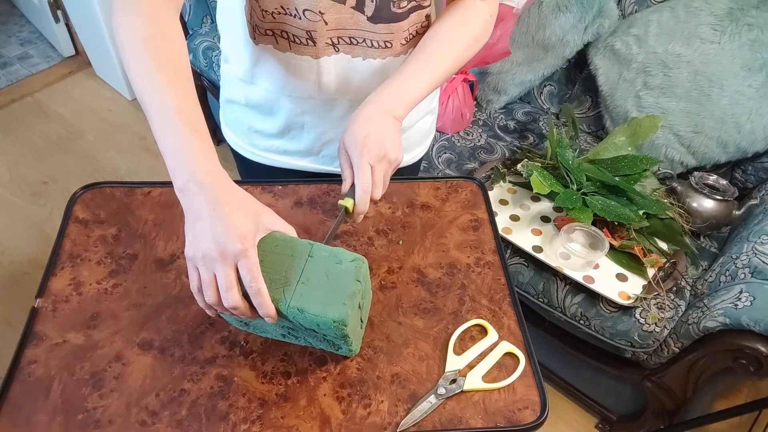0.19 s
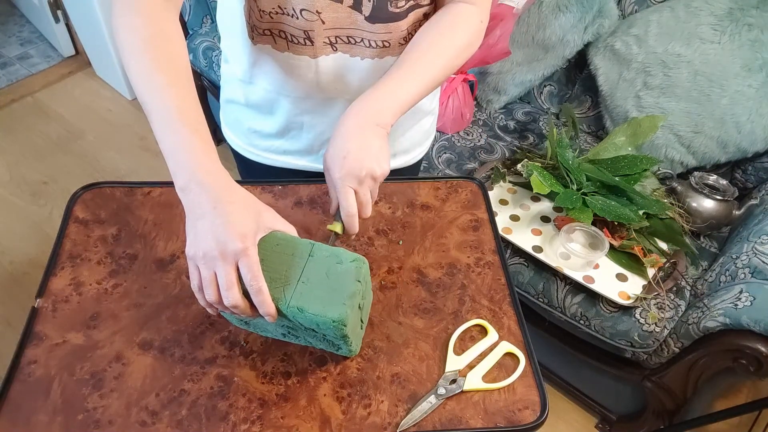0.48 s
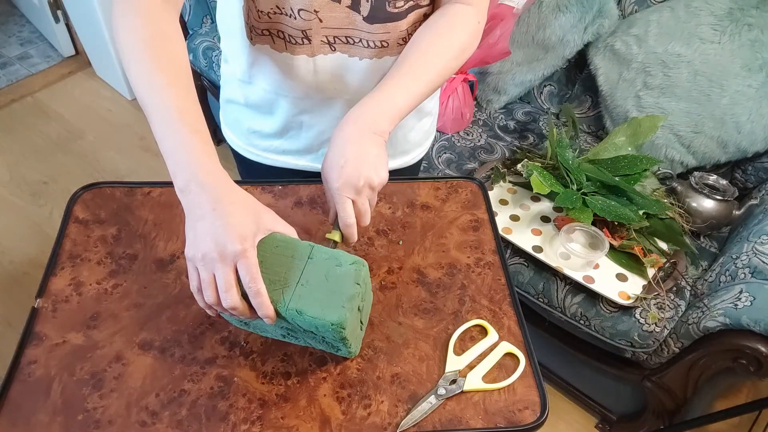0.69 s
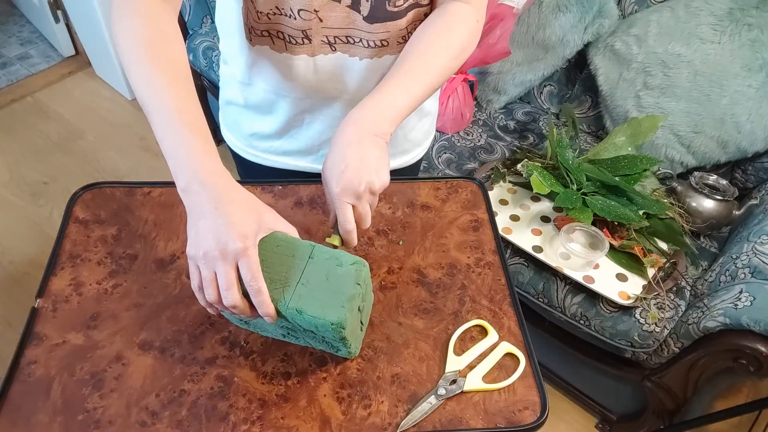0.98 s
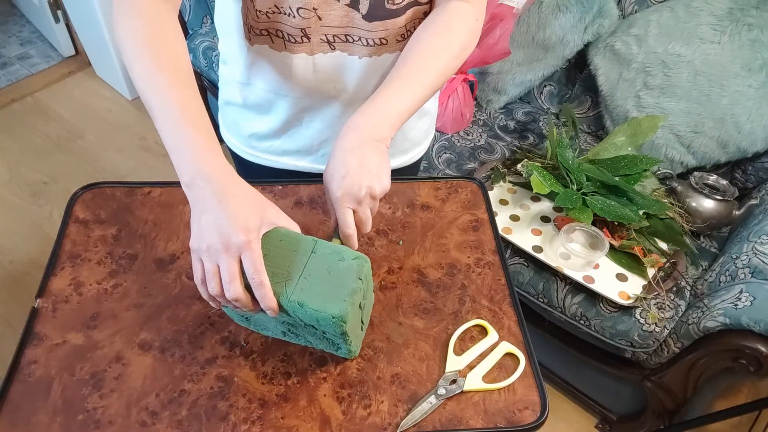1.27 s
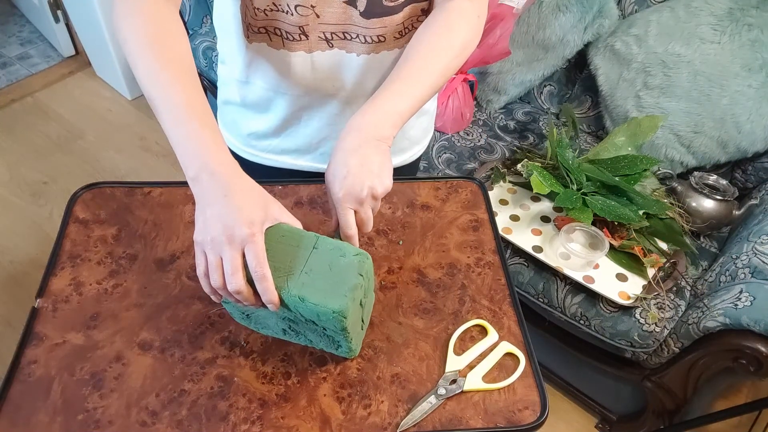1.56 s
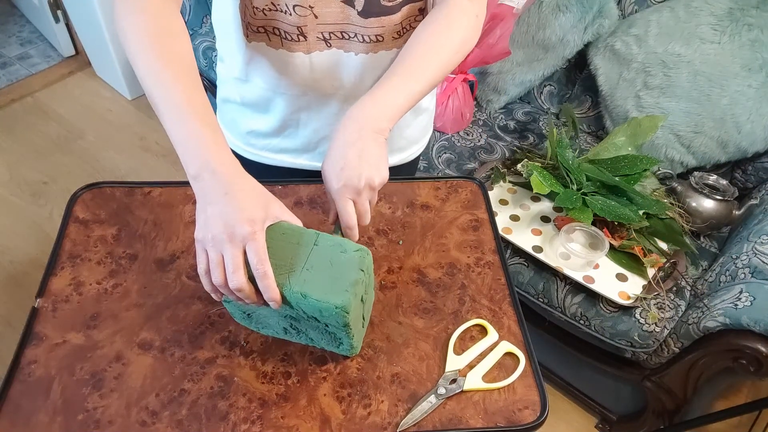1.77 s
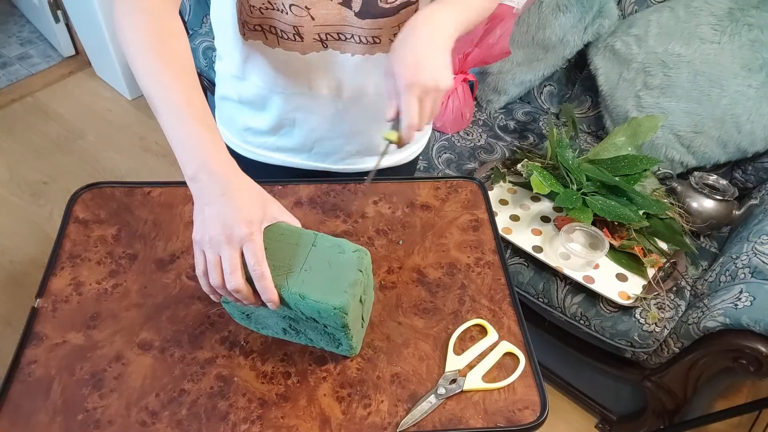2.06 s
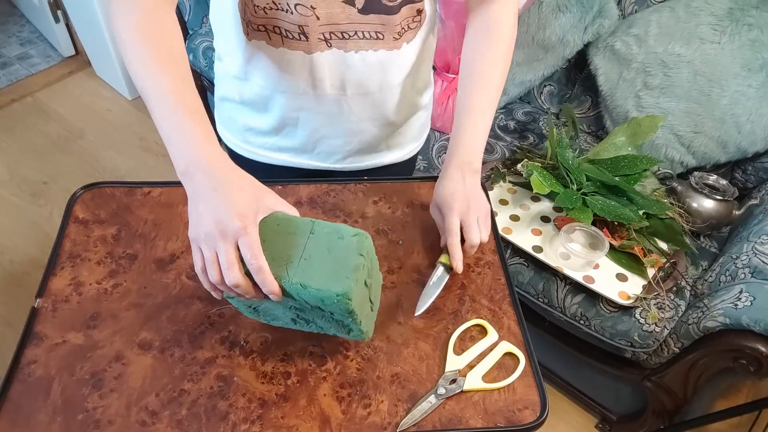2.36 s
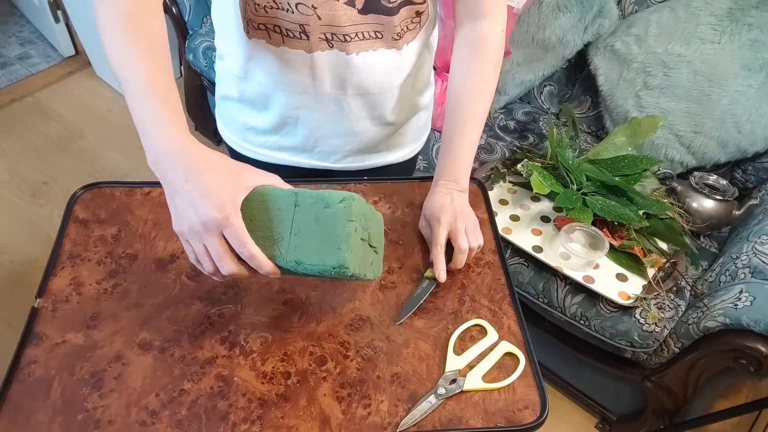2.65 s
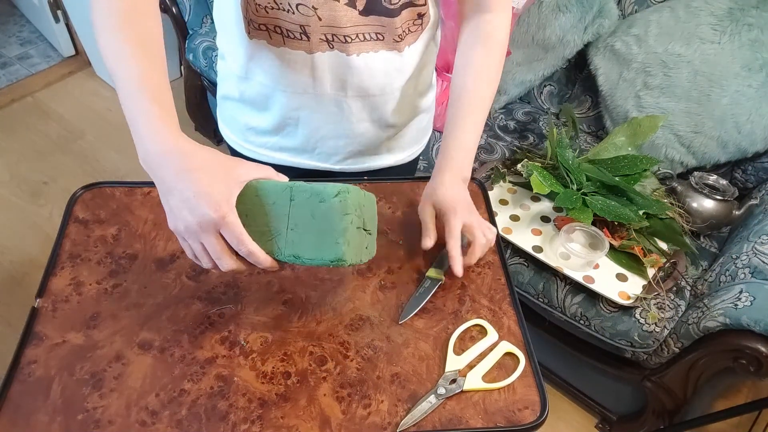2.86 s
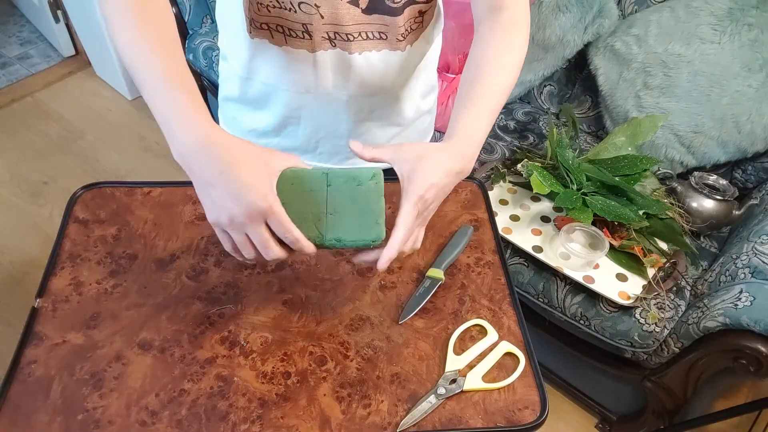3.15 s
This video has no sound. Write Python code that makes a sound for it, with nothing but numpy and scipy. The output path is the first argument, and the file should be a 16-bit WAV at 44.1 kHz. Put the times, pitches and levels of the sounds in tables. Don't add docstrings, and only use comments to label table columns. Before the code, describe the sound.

A knife saws a dry foam block in crunchy, uneven strokes that turn hollow; the blade knocks the wooden table sharply, weak scrapes follow, then the knife is set down softly. Small furnished room, close stereo microphone.

```python
import sys
import numpy as np
from scipy import signal
from scipy.fft import rfft, irfft, next_fast_len
from scipy.io import wavfile
from scipy.ndimage import uniform_filter1d, map_coordinates

SR = 44100
rng = np.random.default_rng(int(sys.argv[2]) if len(sys.argv) > 2 else 0)


def linear_from_db(decibels):
    return 10 ** (np.asarray(decibels, float) / 20)


def wav_out(sig):
    wavfile.write(sys.argv[1], SR, np.round(np.clip(np.atleast_2d(sig).T, -1, 1) * 32767).astype(np.int16))


N = 145530

# (frequency [Hz], density [dB per Hz])
CHOP_TONE = [(47, -28), (80, -11), (382, -12.5), (607, -3), (1050, -4.5), (1750, -5), (8000, -26),
             (15500, -37.5)]


def sawing():
    # (start [s], rise [s], stop [s], level [dB], fade [s])
    strokes = [
        (.0, 0.33, .6, -40, 0.12),
        (0.748, 0.0064, 0.79, -42.5, 0.12),
        (0.882, 0.003, 1.116, -42.5, 0.15),
        (1.236, 0.0072, 1.26, -38, 0.11),
        (1.446, 0.032, 1.667, -49.5, 0.01),
        (1.773, 0.039, 1.899, -47.5, .1),
        (1.955, 0.009, 2.015, -61, 0.01),
        (3.188, 0.0015, 3.207, -54.5, 0.078),
    ]
    # (time [s], level [dB])
    depth = [(0, -70), (.5, -25), (.66, 6.5), (.8, -1.5), (1.2, -1), (1.55, 2.5), (1.8, -1), (1.95, -24),
             (3.3, -9)]
    # (frequency [Hz], density [dB per Hz])
    rasp_tone = [(150, -48), (250, -16.5), (1430, 0.5), (1560, -3), (2060, -1), (6100, -9.5), (8040, -4.5),
                 (8920, -14), (15500, -14)]
    # (frequency [Hz], width [Hz], level [dB])
    block = [(270, 25, -19.5), (362.4, 34, 5.5), (453, 110, -9.5), (663, 105, -2.5), (1100, 410, -12),
             (1930, 535, -1.5)]
    rise_db, fade_db, sag_db_per_s = 22, 24, 6.5
    cells_per_s, cell_spread_db, smooth_share = 6000, 3.5, 0.79

    t = np.arange(N) / SR
    push = np.zeros(N)
    for start, rise, stop, db, fade in strokes:
        onset = rise_db * np.clip(1 - (t - start) / rise, 0, None) ** 2
        sag = sag_db_per_s * (t - start)
        decay = fade_db * np.clip((t - stop) / fade, 0, 9) ** 0.96
        push += linear_from_db(db - onset - sag - decay) * (t > start)
    push *= linear_from_db(0.75 * wobble(13.45) + 0.75 * wobble(69.6))

    chance, size = rng.random((2, N))
    crushed = chance < cells_per_s / SR
    cells = crushed * linear_from_db(-cell_spread_db * np.log(size + 0.0037)) * rng.standard_normal(N)
    grit = patchy(smooth_share * rng.standard_normal(N) + unit(cells), patchy_db=3.5)

    def resonances(f):
        return sum((-1) ** k * linear_from_db(db) * peak(f, hz, width) for k, (hz, width, db) in enumerate(block))

    rasp = unit(filtered(grit, lambda f: linear_from_db(along(rasp_tone, f))))
    hum = unit(filtered(grit, resonances))
    coupling = linear_from_db(np.interp(t, *np.transpose(depth)) + 3)
    return push * (rasp + coupling * hum)


def rubs():
    # (centre [s], length [s], frequency [Hz], width [Hz], level [dB])
    rub_events = [(.39, .07, 7990, 200, -50), (.42, .04, 6900, 200, -54), (.28, .12, 1350, 150, -52),
                  (.66, .035, 365, 70, -52), (1.65, .03, 1250, 60, -48), (1.99, .04, 2200, 600, -58),
                  (2.27, .08, 2500, 4000, -70), (2.746, .018, 550, 200, -55), (.47, .05, 8300, 500, -56),
                  (1.805, .02, 1250, 90, -50), (2.45, .05, 1400, 50, -65), (2.61, .05, 360, 40, -59),
                  (2.7, .04, 360, 50, -59), (3.05, .07, 3230, 110, -72), (2.177, .006, 6500, 3000, -66)]
    out, t = np.zeros(N), np.arange(N) / SR
    noises = rng.standard_normal((len(rub_events), N))
    for (centre, length, hz, width, db), noise in zip(rub_events, noises):
        near = slice(max(round((centre - .2) * SR), 0), round((centre + 0.54) * SR))
        band = unit(filtered(noise[near], lambda f: peak(f, hz, width) ** 2))
        swell = np.exp(-2 * ((t[near] - centre) / length * 2) ** 2)
        out[near] += linear_from_db(db) * band * swell
    return out


def catches():
    # (time [s], peak level [dB], hardness [0 to 1])
    ticks = [
        (.749, -38, .9),
        (.882, -36, 1),
        (1.238, -34.5, 1),
        (1.419, -48, .9),
        (1.448, -40.5, 0.68),
        (1.463, -42.5, 1),
        (1.797, -42.5, 0.37),
        (3.188, -63, 0.97),
    ]
    return knocks(ticks, [], CHOP_TONE, ring_db=0, crack_s=0.012, thud_db=3, thud_s=0.025)


def chopping():
    # (time [s], peak level [dB], hardness [1 = hard])
    chops = [
        (1.5355, -12, 1.68),
        (1.544, -28, 0.22),
        (1.555, -16, 0.25),
    ]
    # (frequency [Hz], level [dB], t60 [s])
    chop_modes = [(102, -22, 0.22), (366, -5, 0.089), (605, -3.5, 0.038), (745, 2, .04), (1085, 0.5, 0.046),
                  (1296, -6, 0.047), (2800, 6.5, 0.0057), (7900, -6.5, .015)]
    return knocks(chops, chop_modes, CHOP_TONE, ring_db=-6.0, crack_s=0.0077, thud_db=-10.5, thud_s=0.11)


def laying_down():
    # (time [s], peak level [dB], hardness [1 = hard])
    landings = [
        (2.7575, -21.5, 0.84),
        (2.7645, -34, 0.24),
        (2.776, -28, .1),
    ]
    # (frequency [Hz], level [dB], t60 [s])
    lay_modes = [(106, -18, 0.17), (227, -10.5, 0.131), (359, -7.5, 0.17), (560, 0, 0.044),
                 (722, -3.5, 0.036), (810, -10, 0.046), (1640, -11, 0.04)]
    # (frequency [Hz], density [dB per Hz])
    lay_tone = [(80, -16), (250, -13), (600, 1.5), (1700, -6), (3000, -14.5), (4600, -29), (8300, -43),
                (15500, -84)]
    return knocks(landings, lay_modes, lay_tone, ring_db=-1, crack_s=0.0075, thud_db=-13.5, thud_s=0.14)


def knocks(hits, modes, tone, ring_db, crack_s, thud_db, thud_s):
    out, t = np.zeros(N + SR), np.arange(SR // 3) / SR
    for (start, db, hard), noise in zip(hits, rng.standard_normal((len(hits), len(t)))):
        ring = 0
        for k, (hz, level, t60) in enumerate(modes):
            decay = linear_from_db(level + ring_db + noise[k] - 60 * t / t60)
            build_up = 1 - np.exp(-t * hz)
            softness = min(hard, 1) ** (hz / 2500)
            ring = ring + decay * np.sin(2 * np.pi * hz * t) * build_up * softness
        crack = hard * linear_from_db(-60 * t / crack_s)
        thud = linear_from_db(thud_db - 60 * t / thud_s)
        clatter = unit(filtered(noise, lambda f: linear_from_db(along(tone, f)))) * (crack + thud)
        out[round(start * SR):][:len(t)] += linear_from_db(db) * (ring + clatter) * (1 - np.exp(-t / 0.00033))
    return out[:N]


def ports(x, turn, lean):
    # (frequency [Hz], left lead [rad])
    lead_curve = [(100, -8), (340, -6), (1200, -3.5), (3000, -3), (7500, -2), (10000, -2), (15000, -2)]
    # (frequency [Hz], left over right [dB])
    lean_curve = [(60, 5.5), (240, 5.5), (950, 3.5), (3770, 3.5), (15000, 12)]
    side = np.array([[.5], [-.5]])

    def response(f):
        phase = np.exp(1j * side * turn * along(lead_curve, f))
        return phase * linear_from_db(side * lean * along(lean_curve, f))

    return filtered(x, response)


def room(x):
    # (frequency [Hz], t60 [s])
    decay_times = [(150, 0.36), (1000, 0.32), (4000, 0.31), (12000, 0.22)]
    out, step = np.zeros((2, N + SR)), SR // 8
    for k in range(0, N, step):
        hz, t, z = signal.stft(rng.standard_normal((2, SR // 2)), SR, nperseg=256)
        decay = linear_from_db(-60 * t / along(decay_times, hz)[:, None])
        tail = signal.istft(z * decay, SR, nperseg=256)[1]
        wet = signal.fftconvolve(x[None, k:k + step], tail / np.linalg.norm(tail[0]), axes=1)
        start = k + 200
        out[:, start:start + wet.shape[1]] += wet
    return out[:, :N]


def low_rumble():
    # (frequency [Hz], density [dB per Hz])
    rumble_tone = [(7.1, -16), (12, 7), (23, -4.5), (38, -15), (60, -12.5), (76, -19), (300, -41),
                   (390, -65), (660, -120)]
    likeness = [(20, 0.46), (200, -0.54)]  # (frequency [Hz], left-right correlation)
    return linear_from_db(-45.5 + np.array([[1.8], [-1.8]])) * rush(rumble_tone, likeness)


def hiss():
    # (frequency [Hz], density [dB per Hz])
    hiss_tone = [(120, -29), (200, -0.5), (555, -6.5), (1030, -13), (1380, -13), (1780, -15.5),
                 (7950, -23.5), (8870, -31), (15600, -13.5)]
    # (frequency [Hz], left-right correlation)
    likeness = [(60, 0.09), (240, -0.92), (950, -0.68), (3770, -0.4), (15000, -0.13)]
    return linear_from_db(-65 + np.array([[1.5], [-1.5]])) * rush(hiss_tone, likeness)


def rush(spectrum, alike):
    def response(hz):
        angle = np.arccos(np.clip(along(alike, hz), -.99, .99)) / 2
        return linear_from_db(along(spectrum, hz)) * np.array([np.ones_like(hz), np.tan(angle)])

    mid, side = filtered(rng.standard_normal((2, N)), response)
    return np.array([mid + side, mid - side]) / np.std(mid)


def patchy(x, patchy_db):
    z = signal.stft(x, nperseg=256)[2]
    field = uniform_filter1d(rng.standard_normal(z.shape), 5, axis=0)
    field = uniform_filter1d(field, 9, axis=1)
    return signal.istft(z * linear_from_db(patchy_db * unit(field)), nperseg=256)[1][:N]


def peak(f, hz, width):
    return 1j * f * width / (hz * hz - f * f + 1j * f * width)


def filtered(x, response):
    m = next_fast_len(x.shape[-1] + 8192)
    spectrum = rfft(x, m) * response(np.fft.rfftfreq(m, 1 / SR))
    return irfft(spectrum, m)[..., :x.shape[-1]]


def wobble(rate):
    return map_coordinates(rng.standard_normal(N // 100), [np.arange(N) * rate / SR])


def along(points, hz):
    f, v = np.transpose(points)
    return np.interp(np.log(hz + 1), np.log(f + 1), v)


def unit(x):
    return x / np.sqrt(np.mean(x ** 2) + 1e-20)


def scene():
    foam = sawing() + rubs() + catches()
    chop = chopping()
    lay = laying_down()
    near = linear_from_db(2.0) * ports(foam, 1.02, 0.86) + ports(chop, 0.55, 0.17) + ports(lay, 0.39, 0.77)
    far = room(foam + linear_from_db(-7) * chop + linear_from_db(-4) * lay) * linear_from_db([[.8], [-.8]])
    return near + far + low_rumble() + hiss()


def low_pass(x):
    return signal.sosfilt(signal.butter(12, 16670, fs=SR, output="sos"), x)


def record(dry):
    # (frequency [Hz], gain [dB])
    port_colour = [(3000, 0.5), (5500, -2), (8000, -0.5), (8900, -6), (10500, 2.5), (13000, 1)]
    top_hz = 15550
    heard = filtered(dry, lambda f: linear_from_db(along(port_colour, f)) * (f < top_hz))
    return low_pass(heard)


dry = scene()
out = record(dry)
wav_out(out)
```